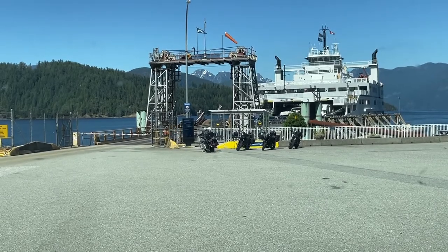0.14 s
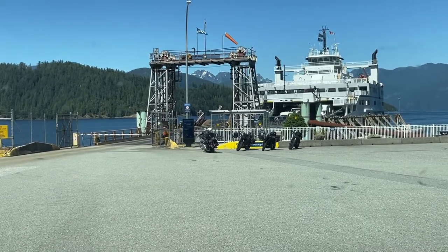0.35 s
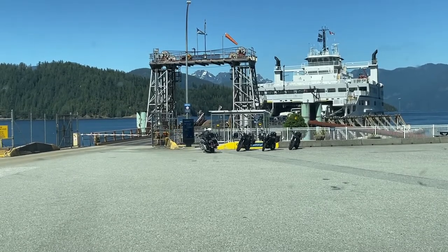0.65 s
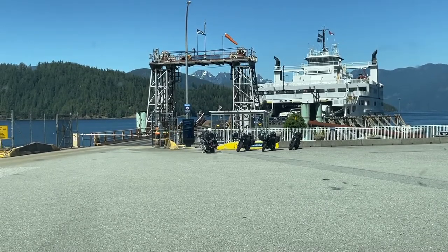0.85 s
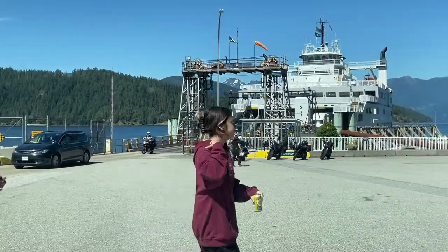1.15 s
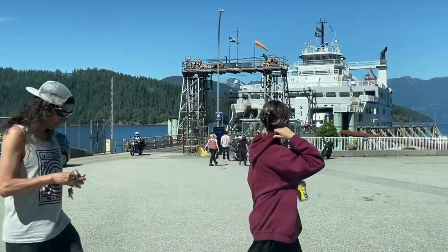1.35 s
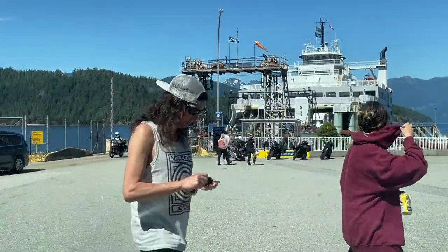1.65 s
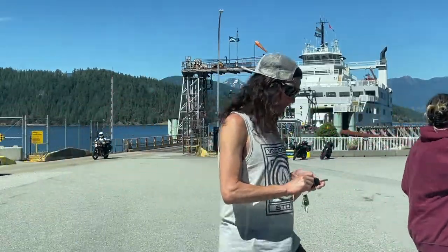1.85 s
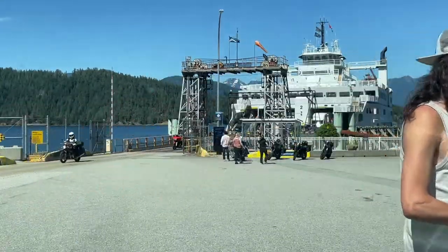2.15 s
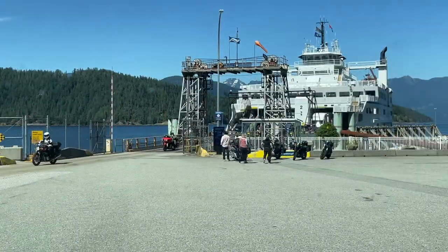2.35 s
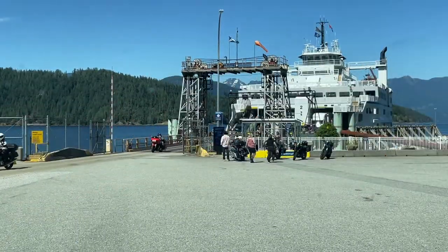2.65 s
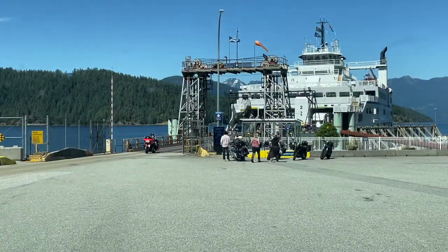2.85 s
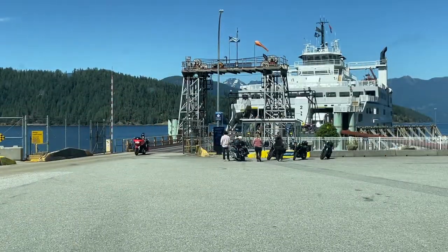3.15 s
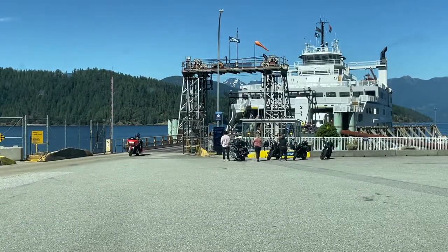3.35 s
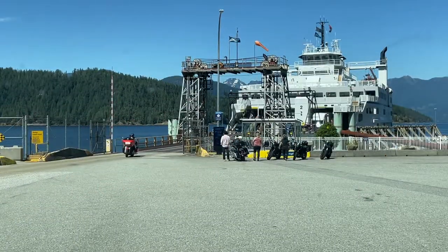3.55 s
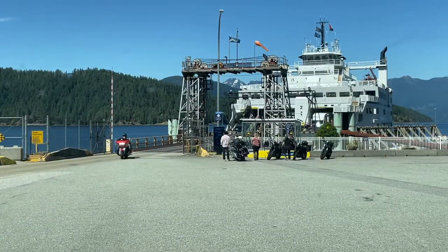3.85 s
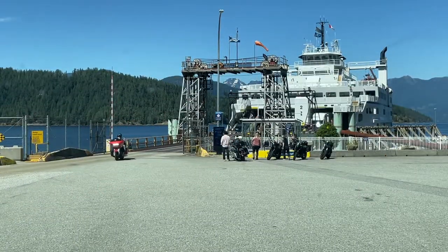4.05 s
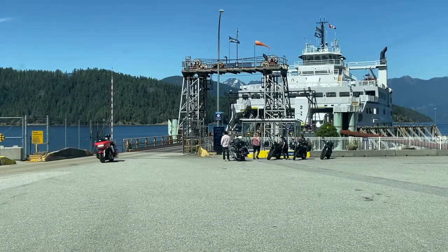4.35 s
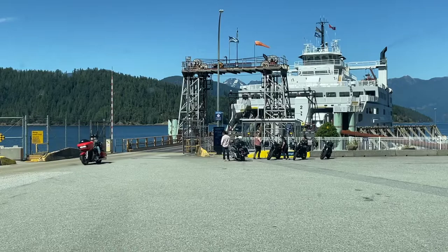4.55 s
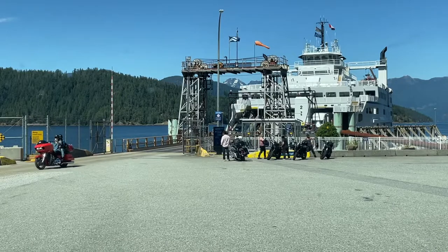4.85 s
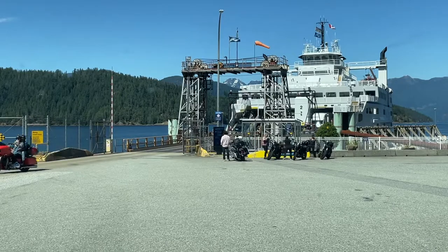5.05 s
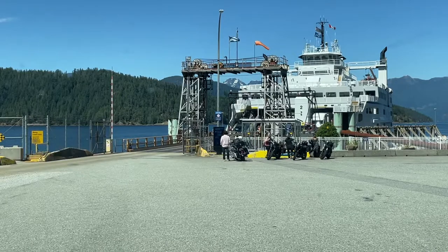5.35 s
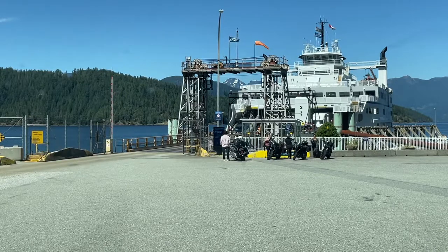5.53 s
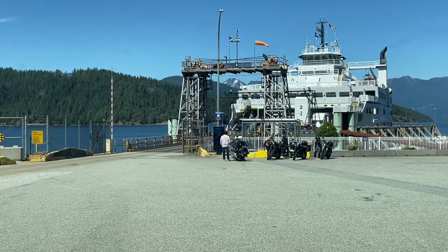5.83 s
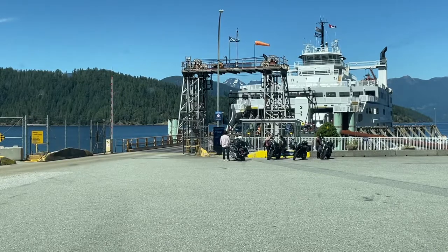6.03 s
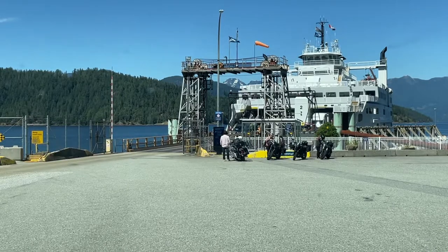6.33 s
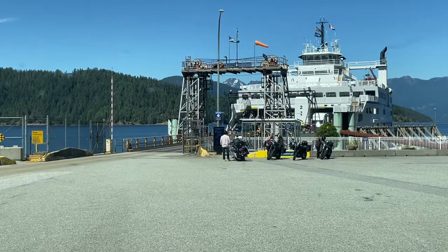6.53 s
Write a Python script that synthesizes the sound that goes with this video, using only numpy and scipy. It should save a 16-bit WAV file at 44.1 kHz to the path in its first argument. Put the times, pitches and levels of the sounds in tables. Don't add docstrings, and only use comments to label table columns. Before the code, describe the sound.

Inside a closed parked car, a low muffled hum with faint cloth rustle and a few small seat creaks. After about a second it cuts to open air: far engines drone and rumble under thin hiss, with small clicks and scuffs nearby. A two-cylinder motorcycle approaches, its lumpy exhaust climbing in pitch and loudness, passes close, then drops sharply as the throttle shuts and briefly reopens. Stereo microphone in the open car.

```python
import sys
import numpy as np
from scipy import signal
from scipy.io import wavfile
from scipy.ndimage import uniform_filter1d

SR = 44100
rng = np.random.default_rng(int(sys.argv[2]) if len(sys.argv) > 2 else 0)


def store_wav(level_fs):
    pcm = np.round(np.clip(np.atleast_2d(level_fs), -1, 1) * 32767)
    wavfile.write(sys.argv[1], SR, pcm.T.astype(np.int16))


def ratio(d):
    e = np.asarray(d, float) / 20
    return 10 ** e


N = 295029


def evened(x):
    return x / np.sqrt(np.mean(abs(x) ** 2) + 1e-20)


def read(points, hz, column=1):
    rows = np.array(points)
    return np.interp(np.log(hz + 1), np.log(rows[:, 0] + 1), rows[:, column])


def curve(rows, column, fade_in=.01, fade_out=0.011):
    rows, t = np.array(rows), np.arange(N) / SR
    rise = 1 + (t - rows[0, 0]) / fade_in
    fall = 1 + (rows[-1, 0] - t) / fade_out
    return ratio(np.interp(t, rows[:, 0], rows[:, column])) * np.clip(np.minimum(rise, fall), 0, 1)


def drift(hz, count=1):
    coarse = np.arange(0, N + 200, 100)
    knots_at = np.arange(400) * SR / hz
    out = []
    for knots in rng.standard_normal((count, 400)):
        smooth = uniform_filter1d(np.interp(coarse, knots_at, knots), int(SR / hz / 200))
        out.append(np.interp(np.arange(N), coarse, smooth))
    return np.array(out)


# f/Hz, width/Hz, level/dB
RESONANCES = [(2654, 43, -3), (3090, 300, -5), (3770, 240, 0), (4700, 92, -3), (5230, 83, -6),
              (5850, 110, -4), (6170, 77, -5), (7520, 62, -8), (8900, 63, -7), (9230, 33, -8)]
RESONANCE_LIFT = [8.2, 6.5, 3.9, 4.1, 2.5, 2, 5.7, 4.6, 1.6, 4.6]


def noise(points, patchy_db, size=1024, rings=False):
    hz = np.fft.rfftfreq(size, 1 / SR)
    a, b, patches = rng.standard_normal((N * 4 // size + 5, len(hz), 3)).T
    patches = uniform_filter1d(patches, size // 100, 0)
    patches = evened(uniform_filter1d(patches, 10240 // size, 1))
    colour_db = read(points, hz)
    clouds = 0
    if rings:
        clouds = evened(uniform_filter1d(uniform_filter1d(patches, 30, 0), 40, 1))
        for (f, width, _), db in zip(RESONANCES, RESONANCE_LIFT):
            colour_db = colour_db + db / (1 + (2 * (hz - f) / width) ** 2)
    z = (a + 1j * b) * ratio(colour_db[:, None] + patchy_db * patches + 0.81 * clouds)
    return evened(signal.istft(z, nperseg=size, noverlap=size * 3 // 4)[1][:N])


def resonate(x, hz, width):
    turn = np.exp(2j * np.pi * np.cumsum(hz * np.ones(len(x))) / SR)
    r = np.exp(-np.pi * width / SR)
    return 2 * (turn * signal.lfilter([1 - r], [1, -r], x / turn)).real


def ringing_noise(x, hz, width):
    return evened(resonate(resonate(x, hz, width), hz, width))


def highpass(x, hz, order=4):
    return signal.sosfilt(signal.butter(order, hz, "high", fs=SR, output="sos"), x)


def echoes(x, t60, wet_db):
    at = np.arange(200, SR // 2, 40)
    at = at + rng.integers(0, 40, len(at))
    tail = np.zeros(SR)
    tail[at] = rng.choice([-1., 1.], len(at)) * ratio(-60 * at / SR / t60)
    return x + ratio(wet_db) * signal.fftconvolve(x, tail / np.linalg.norm(tail))[:N]


FIRING_GAP = 0.41
STUMBLE = .3
NOTCH_S, NOTCH_HZ, NOTCH_WIDTH_HZ, NOTCH_DB = (5.404, 6.08), (167, 282), 30, -12.5
# level/dB when
EXHAUST_ORDERS = [(-4, -5.5, -2, -8, -13, -5), (-11, -8, -42, 0.5, -6.5, -1), (-0.5, 2.5, -4.5, -9, 2, 0.5),
                  (-5.5, 1, -1, 0, -8, -6.5), (-15, -35, -8.5, -2, -26, -28),
                  (-6.5, -13, -9.5, -9.5, -1, -7), (-7, -21, -18.5, -18.5, -18.5, 1.5),
                  (-12, -21.5, -23.5, -14, -23, -9.5), (-14.5, -21, -20, -24, -24, -23),
                  (-14.5, -19, -19, -26, -27, -14.5), (-22, -23.5, -18, -27, -36, -20.5),
                  (-34, -24, -22.5, -40, -34, -31), (-18.5, -16, -28.5, -49, -42, -30),
                  (-17, -33, -35, -46, -47, -26), (-18, -26, -25, -48, -49, -38),
                  (-23.5, -31.5, -30.5, -49, -51, -45), (-28, -29, -28, -51, -55, -56),
                  (-38, -42, -37, -46, -46, -49), (-40, -38, -37, -43, -43, -40),
                  (-58, -49, -42, -46, -54, -52), (-59, -31, -40, -48, -52, -34),
                  (-44, -40, -27, -48, -48, -46), (-54, -36, -41, -48, -57, -54)]
# f/Hz, level/dB
WAY_IN = [(62, -32), (85, -6), (105, 1.5), (135, -5), (172, -9), (212, -3), (250, -3), (287, -1.5),
          (320, -15), (350, -0.5), (375, -0.5), (440, -4.5), (495, 7.5), (580, -4), (640, -2.5), (690, 6.5),
          (740, 1.5), (850, 8), (930, -3.5), (995, 7), (1090, -12)]


def exhaust_tones(cycle_hz, turns, load, rough):
    t = np.arange(N) / SR
    notch_hz = np.interp(t, NOTCH_S, NOTCH_HZ)
    notch_db = NOTCH_DB * np.clip(np.minimum(t - NOTCH_S[0], NOTCH_S[1] - t) / 0.15 + 1, 0, 1)
    wander = drift(16, count=2 * len(EXHAUST_ORDERS))
    stumble = STUMBLE * rough ** 2 * drift(35)[0]
    low, high = np.zeros(N), np.zeros(N)
    for k, db in enumerate(EXHAUST_ORDERS):
        order = k + 2
        hz = order * cycle_hz
        pair = np.angle(1 + 0.85 * np.exp(-2j * np.pi * order * FIRING_GAP))
        slip = (1.2 + .09 * order) * rough * wander[2 * k] + order * stumble
        phase = 2 * np.pi * order * turns + pair - 0.0696 * order ** 2 + slip
        fade_db = min(1.7 * order, 16) * np.minimum(rough, .33) * wander[2 * k + 1]
        level_db = np.interp(load, np.arange(len(db)), db) + read(WAY_IN, hz) + np.minimum(fade_db, 3.5)
        level_db = level_db + 1.8 * np.minimum(load, 0) * (order - 4)
        level_db = level_db + notch_db / (1 + (2 * (hz - notch_hz) / NOTCH_WIDTH_HZ) ** 2)
        tone = -ratio(level_db) * np.cos(phase)
        upper = np.clip((hz - 420) / 50, 0, 1)
        low = low + (1 - upper) * tone
        high = high + upper * tone
    return np.sqrt(2) * low, high / np.sqrt(uniform_filter1d(high ** 2, SR // 5))


# f/Hz, level/dB per Hz
ROAR_COLOUR = [(35, -53), (60, -60), (96, 5.5), (124, 8), (161, -13), (215, 4.5), (270, -2.5), (304, -0.5),
               (365, -4.5), (1400, -39), (1820, -52), (3080, -120)]


def exhaust_roar(turns):
    first = np.exp(5.9 * np.cos(2 * np.pi * turns))
    second = np.exp(7.2 * np.cos(2 * np.pi * (turns - FIRING_GAP)))
    puff = evened(first + second)
    return highpass(noise(ROAR_COLOUR, 1.5, size=2048) * (1 + 0.14 * puff), 70)


SHAKE_HZ, SHAKE_WIDTH_HZ, SHAKE_DB = 48.6, 52, -39.5
# t/s, engine cycle f/Hz, exhaust level/dB
BIKE_RUN = [(3.9, 24.42, -36), (4.25, 27.51, -29), (4.46, 29.67, -25.5), (4.55, 28.5, -25.5),
            (4.63, 26.41, -26), (4.86, 29.51, -24.5), (4.98, 31.94, -25), (5.15, 35.9, -25),
            (5.3, 39.59, -21), (5.66, 48.66, -20.5), (5.86, 52.49, -18.5), (6.11, 55.89, -16.5),
            (6.32, 57.94, -16), (6.35, 56.57, -15.5), (6.5, 46.75, -13.5), (6.6, 40.53, -16),
            (6.69, 40.2, -18)]
# t/s, state (below 0 far and dull, 0 rolling, 1 winding up, 2 full, 3 shut,
# 4 coasting, 5 reopened), roughness 0-1, bark level/dB against the exhaust
RIDER_HAND = [(3.9, -.8, .3, -23), (4.55, -.7, .3, -26), (4.83, -.3, .28, -24), (4.88, 0, .22, -15),
              (5.17, 0, .26, -11.5), (5.3, 1, .23, -15.5), (5.5, 1, .23, -15), (5.7, 1.6, .21, -13),
              (5.95, 2, .18, -14), (6.33, 2, .13, -15), (6.38, 3, .3, -19), (6.44, 3, .33, -20),
              (6.5, 4, .29, -22), (6.55, 4, .36, -22), (6.6, 5, .36, -19)]
# t/s, length/s, level/dB
MISSED_FIRINGS = [
    (6.457, 0.0065, -3),
    (6.57, .014, -1),
]


def motorcycle():
    t, run, hand = np.arange(N) / SR, np.array(BIKE_RUN), np.array(RIDER_HAND)
    cycle_hz = np.interp(t, run[:, 0], run[:, 1])
    load, rough, bark_db = (np.interp(t, hand[:, 0], hand[:, c]) for c in (1, 2, 3))
    turns = np.cumsum(cycle_hz * (1 + 0.00455 * drift(12)[0])) / SR
    low, high = exhaust_tones(cycle_hz, turns, load, rough)
    roar = exhaust_roar(turns)
    bark = evened(highpass(roar, 450))
    clean = np.sqrt(1 - rough ** 2)
    body = curve(BIKE_RUN, 2, 1.0, 9.) * (clean * low + 1.22 * rough * evened(roar))
    top = 0.9 * clean * high + (0.18 + 1.4 * rough) * bark
    top = curve(BIKE_RUN, 2, 0.52, 9.) * ratio(bark_db) * top
    shake = ringing_noise(rng.standard_normal(N), SHAKE_HZ, SHAKE_WIDTH_HZ)
    body = body + curve(BIKE_RUN, 2, .9, 9.) * ratio(SHAKE_DB) * shake
    missed_db = sum(db * np.exp(-((t - s) / length) ** 2) for s, length, db in MISSED_FIRINGS)
    return echoes((body + top) * ratio(missed_db), t60=.3, wet_db=-15)


# from t/s,
# to t/s, from f/Hz, to f/Hz, width/Hz, level/dB
WHISTLES = [(5.201, 5.6, 3740, 4270, 160, -53.5), (5.3, 5.95, 10400, 10800, 440, -62),
            (5.5, 6.15, 3996, 5550, 227, -60), (5.85, 6.55, 3400, 3500, 242, -68),
            (5.7, 6.1, 6800, 6700, 253, -65), (3.45, 4.15, 13600, 13500, 700, -67),
            (3.5, 4.1, 6000, 6500, 260, -67), (4.9, 5.15, 12000, 14000, 1500, -66),
            (5.2, 5.7, 4700, 4900, 151, -66), (1.54, 1.66, 1100, 1350, 60, -63),
            (1.82, 2.02, 890, 900, 57, -57.5), (2.26, 2.42, 830, 834, 60, -58)]


def whistles():
    out = np.zeros(N)
    for start, end, from_hz, to_hz, width, db in WHISTLES:
        hz = np.linspace(from_hz, to_hz, int((end - start) * SR))
        whistle = ringing_noise(rng.standard_normal(len(hz)), hz, width)
        out[int(start * SR):][:len(hz)] += ratio(db) * whistle * np.hanning(len(hz))
    return out


CLICK_RISE_S, SCUFF_RISE_S, GRIT_DB = 0.0054, 0.015, 2
# f/Hz, level/dB per Hz
SNAP_COLOUR = [(500, -2), (1000, -47), (2000, -9.5), (4000, -5), (6500, -8.5), (9000, -12), (12500, -15.5),
               (15500, -25)]
# t/s, bright level/dB, knock level/dB, knock f/Hz, time to die by 60 dB/s
SHARP_CLICKS = [(1.470, -56, -75, 1300, .03), (2.112, -46, -49, 910, 0.037), (2.180, -63, -75, 9000, .02),
                (2.278, -54, -56, 3850, .04), (2.979, -46, -45, 970, 0.16), (3.260, -63, -34, 640, 0.056),
                (3.263, -56, -37.5, 400, 0.13), (3.452, -61, -49, 3900, 0.055),
                (3.469, -26, -28.5, 1140, 0.027), (3.475, -65, -27.5, 300, 0.17),
                (3.478, -49.5, -28, 530, 0.087), (3.525, -48.5, -56, 1230, 0.23),
                (3.592, -61, -72, 3500, 0.055), (3.812, -51, -57, 4800, 0.035),
                (6.434, -48, -50, 4700, 0.14), (.852, -90, -48, 300, .08), (3.472, -70, -45, 800, 0.054)]
# t/s, bright level/dB, knock level/dB, knock f/Hz, time to die by 60 dB/s
SOFT_SCUFFS = [
    (1.200, -61, -72, 3000, 0.23),
    (2.085, -52, -48, 876, 0.13),
    (3.385, -54.5, -83, 1200, 0.3),
    (3.795, -52, -56.5, 1490, 0.11),
    (4.065, -52.5, -54, 1450, 0.1),
    (4.765, -53.5, -71, 3000, 0.16),
    (5.045, -49.5, -56, 5283, 0.19),
    (6.403, -44, -46, 4740, 0.1),
    (5.688, -47.5, -63, 4900, 0.28),
]


def ticks():
    length = 9000
    out, t = np.zeros(N + length), np.arange(length) / SR
    grit = evened(uniform_filter1d(rng.standard_normal(N), size=90))
    bright = evened(noise(SNAP_COLOUR, 1.5, size=256) * ratio(GRIT_DB * grit))
    for rows, rise in ((SHARP_CLICKS, CLICK_RISE_S), (SOFT_SCUFFS, SCUFF_RISE_S)):
        for s, bright_db, knock_db, hz, t60 in rows:
            at = int(s * SR)
            shape = (1 - np.exp(-t / rise)) * ratio(-60 * t / t60)
            knock = ringing_noise(rng.standard_normal(length), hz, min(0.36 * hz, 600))
            burst = ratio(bright_db) * bright[at:at + length] + ratio(knock_db) * knock
            out[at:at + length] += shape / shape.max() * burst
    return out[:N]


SWELL_DB, SWELL_HZ = .8, 7.
# t/s, rumble level/dB, air level/dB
FAR_ENGINES = [
    (0.94, -33.5, -59),
    (1.15, -33.5, -56.5),
    (2.3, -33.5, -54.5),
    (2.9, -31, -54),
    (3.4, -31, -54),
    (3.7, -31.5, -52.5),
    (3.95, -30.5, -56),
]
# f/Hz, level/dB per Hz
RUMBLE_COLOUR = [(18, -83), (30, -37), (64, -24), (80, -6.5), (108, 1.5), (130, -1), (162, -20), (205, -7),
                 (386, -20.5), (459, -21), (505, -24), (760, -40.5), (934, -35.5), (1160, -86), (1300, -39),
                 (1690, -91), (2860, -120)]
# f/Hz, noisy width/Hz, noisy level/dB, steady tone level/dB, pitch wander share
PIPE_DRONES = [
    (103, 13, -6, -3, 0.025),
    (201, 10.4, -21, -8, 0.007),
    (227, 14, -20, -17, 0.015),
    (317.4, 24.3, -20, -23, 0.0198),
    (461.5, 30, -16, -27, 0.0209),
    (922, 70, -31, -60, 0.025),
    (124, 10, -12, -5, 0.02),
]


def yard():
    wander, drones = drift(5.4, count=2 * len(PIPE_DRONES)), 0
    for k, (hz, width, noisy_db, tone_db, share) in enumerate(PIPE_DRONES):
        drones = drones + ratio(noisy_db) * ringing_noise(rng.standard_normal(N), hz, width)
        tone = np.sin(2 * np.pi * np.cumsum(hz * (1 + share * wander[2 * k])) / SR)
        drones = drones + ratio(tone_db + 1.56 * wander[2 * k + 1]) * tone
    rumble = evened(noise(RUMBLE_COLOUR, 0.22, size=4096) + 0.78 * drones)
    return curve(FAR_ENGINES, 1, .008, 1.1) * rumble * ratio(SWELL_DB * drift(SWELL_HZ)[0])


PASS_S, PASS_M, SPEED_M_PER_S, TYRES_DB = 6, 3.38, 9.3, -45
FIZZ_HZ, FIZZ_S, FIZZ_DB = 6000, 6.05, 0.9
# f/Hz, level/dB per Hz
AIR_COLOUR = [(410, 4), (700, 1), (776, -4.5), (955, -1.5), (1450, -10), (1540, -4), (2250, -10),
              (3030, -12.5), (3450, -14), (3920, -5.5), (5570, -15), (9350, -16), (12400, -20.5),
              (14300, -23), (15500, -45)]
# f/Hz, level/dB per Hz
HISS_COLOUR = [(590, -79), (1000, -2), (1460, -14), (1600, -11), (1790, -13.5), (3370, -19), (3910, -10),
               (4440, -17), (4870, -14.5), (5400, -18), (10700, -23), (14000, -31), (15500, -30)]


def open_air():
    t = np.arange(N) / SR
    far = noise(AIR_COLOUR, 1.3, rings=True) * ratio(.5 * SWELL_DB * drift(SWELL_HZ)[0])
    near = noise(HISS_COLOUR, 1.5, rings=True) * np.clip((t - BIKE_RUN[0][0]) / .5 + 1, 0, 1)
    fizz = highpass(near, FIZZ_HZ, order=2)
    near = near + fizz * (ratio(-FIZZ_DB * np.tanh((t - FIZZ_S) / 0.059)) - 1)
    nearness = PASS_M / np.hypot(PASS_M, SPEED_M_PER_S * (t - PASS_S))
    hiss = curve(FAR_ENGINES, 2, .004, .4) * far + ratio(TYRES_DB) * nearness * near
    return echoes(hiss, t60=.03, wet_db=-10)


CLOSED_S, HUM_DB, STILL_DB = .925, -42, -68.5
# f/Hz, level/dB per Hz
HUM_COLOUR = [(11, -45), (18, -1), (59, -20), (74, -8), (87, -26.5), (128, -13.5), (161, -13.5), (184, -27),
              (231, -17.5), (384, -38.5), (900, -44.5), (1170, -56), (1980, -120)]
# f/Hz, level/dB per Hz
RUSTLE_COLOUR = [(290, -58), (500, -9.5), (710, -40), (984, -21), (1070, -29), (1190, -18), (1640, -16),
                 (1890, -17.5), (2030, -17.5), (7000, -40.5), (8300, -66), (9600, -53), (13000, -57),
                 (19800, -120)]
# start t/s, length/s, level/dB
CLOTH_MOVES = [
    (0.0, .11, -73),
    (.485, .2, -65),
    (.79, .14, -72),
]
# t/s, level/dB, f/Hz, length/s
SEAT_CREAKS = [
    (.53, -74, 1880, 0.036),
    (0.61, -71, 1550, 0.056),
    (0.568, -58, 1850, 0.067),
    (.61, -60, 1210, 0.033),
    (0.65, -58, 940, 0.039),
    (0.39, -64, 930, 0.052),
    (0.59, -76, 4600, .06),
    (.885, -65, 810, 0.059),
    (.6, -67, 2200, .04),
]


def cabin():
    t = np.arange(N) / SR
    idle_hz = 55 * (1 + 0.0047 * drift(4.6)[0])
    tone = ratio(2.4) * np.sin(2 * np.pi * np.cumsum(idle_hz) / SR)
    cloth = ratio(STILL_DB)
    for s, length, db in CLOTH_MOVES:
        cloth = cloth + ratio(db) * np.sin(np.pi * np.clip((t - s) / length, 0, 1) ** .5)
    out = ratio(HUM_DB) * (noise(HUM_COLOUR, 1.7, size=4096) + tone) + cloth * noise(RUSTLE_COLOUR, 3.7)
    out = out * np.clip((CLOSED_S - t) / 0.037 + 1, 0, 1)
    for s, db, hz, length in SEAT_CREAKS:
        t = np.arange(int(length * SR)) / SR
        creak = np.sin(np.pi * t / length) * np.sin(2 * np.pi * hz * t)
        out[int(s * SR):][:len(t)] += ratio(db) * creak
    return out


def scene():
    return np.tile(motorcycle() + whistles() + ticks() + yard() + open_air() + cabin(), (2, 1))


def roll_off(x):
    return signal.sosfilt(signal.butter(12, 15770, fs=SR, output="sos"), x)


# f/Hz, level/dB
PORT_DIFFERENCE = [(60, -20), (110, -15), (200, -11.5), (380, -6), (700, -1), (1290, 6.5), (2380, 0),
                   (4400, -7), (8120, -49), (15000, 3.5)]
# f/Hz, steady share of that difference 0-1, its phase lead/radians
PORT_PHASE = [(60, 0.6, 7.1), (132, 1, 1.5), (300, 0.5, 1.42), (640, 0.6, 1.3), (1360, 0.28, 1.56),
              (2000, 0.3, 1.54), (2900, 1, 1.43), (4970, 0.46, 0.26), (12800, 0.8, 1.57)]


def record(dry):
    lowpass = signal.firwin(255, 15050, fs=SR)
    mid = signal.oaconvolve(np.pad(dry.mean(0), 127, "reflect"), lowpass, "valid")
    hz, _, z = signal.stft(mid, SR, nperseg=1024, noverlap=768, boundary="even", padded=False)
    scatter = rng.standard_normal((2,) + z.shape)
    scatter = uniform_filter1d(uniform_filter1d(scatter, 3, 1), 6, 2)
    steady = np.clip(read(PORT_PHASE, hz), 0, 1)[:, None]
    turn = steady * np.exp(1j * read(PORT_PHASE, hz, column=2))[:, None]
    turn = turn + np.sqrt(1 - steady ** 2) * np.exp(1j * np.arctan2(*scatter))
    side = z * turn * ratio(read(PORT_DIFFERENCE, hz))[:, None]
    side = signal.istft(side, SR, nperseg=1024, noverlap=768)[1]
    side = np.pad(side, (0, N), "reflect")[:N]
    fade = np.sin(np.pi / 2 * np.minimum(np.arange(N)[::-1] / (.004 * SR), 1)) ** 2
    mid, side = mid * fade, side * fade
    return roll_off(np.array([mid + side, mid - side]))


dry = scene()
out = record(dry)
store_wav(out)
```